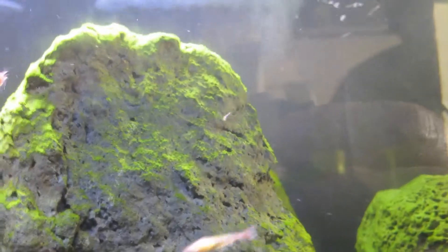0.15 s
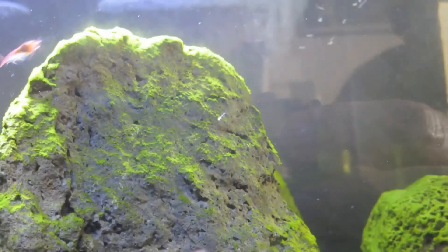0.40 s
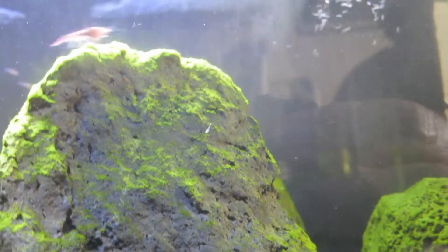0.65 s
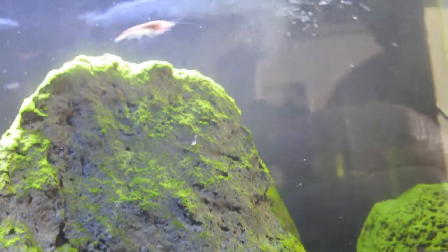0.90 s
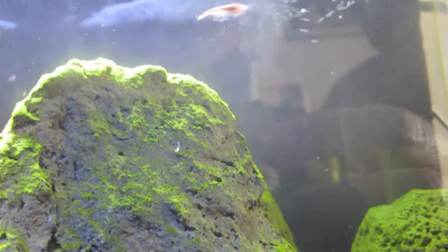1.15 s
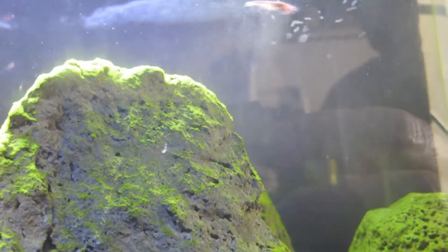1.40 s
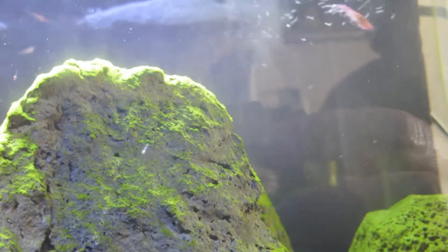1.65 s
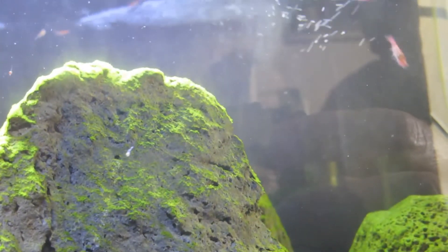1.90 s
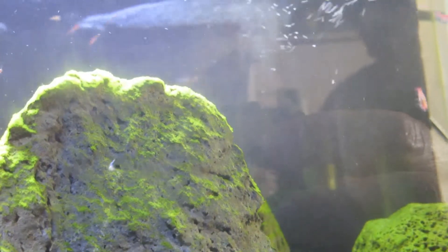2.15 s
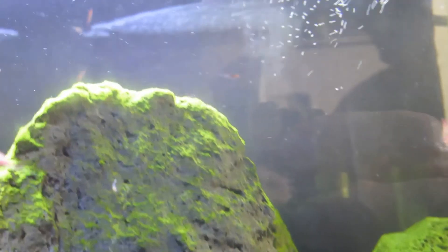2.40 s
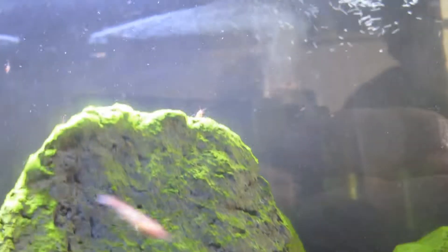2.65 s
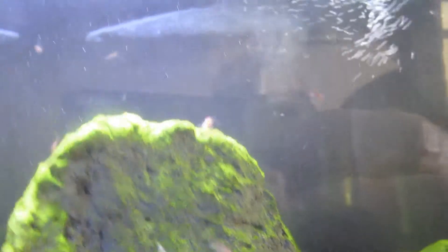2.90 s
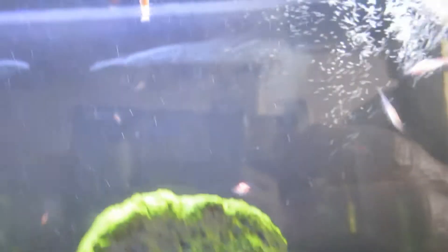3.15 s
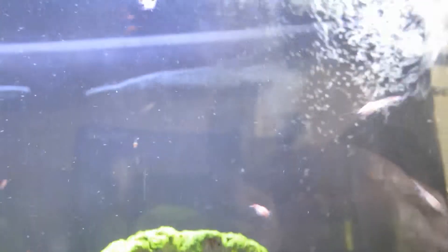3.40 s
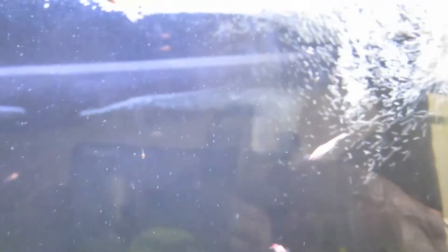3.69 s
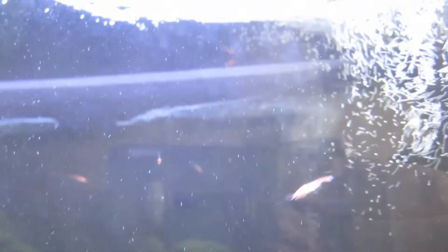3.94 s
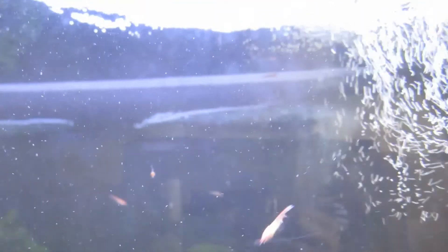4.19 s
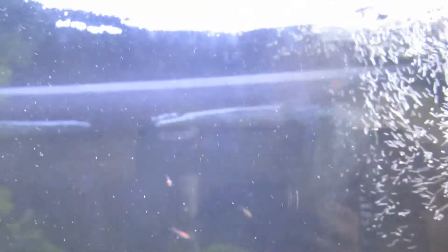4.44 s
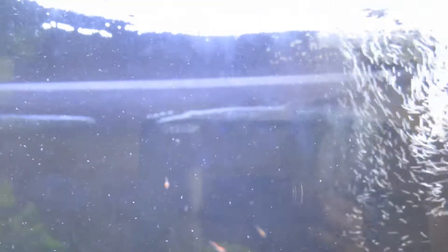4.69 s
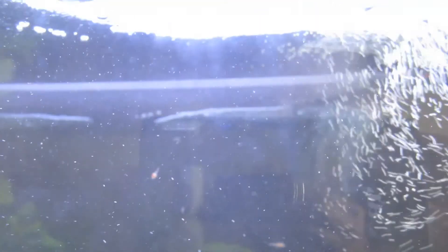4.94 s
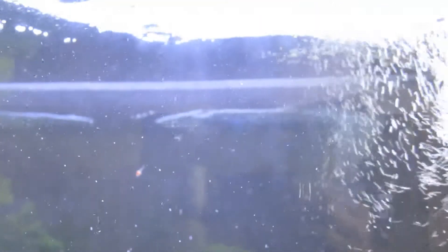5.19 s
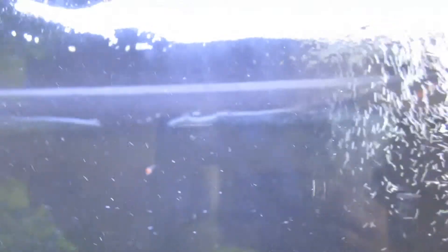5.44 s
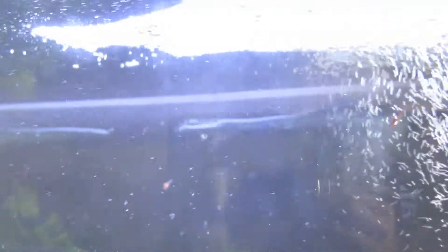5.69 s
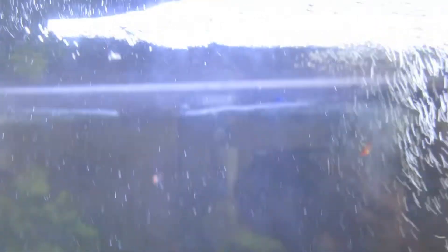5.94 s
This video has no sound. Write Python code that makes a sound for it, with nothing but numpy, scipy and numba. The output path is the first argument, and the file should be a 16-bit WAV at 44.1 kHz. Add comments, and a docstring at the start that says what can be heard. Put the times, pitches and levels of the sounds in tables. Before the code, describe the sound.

A small air pump hums and buzzes steadily beside a fish tank, with faint fizzing bubbles, soft gurgles and a dull room rumble.

```python
"""A mains-driven diaphragm air pump hums beside a fish tank: wavering sines at multiples of mains.
Its valve is a smeared tick repeated every cycle; short rising sine pings make fizz, burble and gurgles.
Wavering drones of other small motors and a dull, surging noise rumble lie behind.
Two microphone ports close together rise from the tank floor to the water line, shifting the balance;
coarse rounding of the finished mix's spectral lines leaves holes in the treble."""
import sys
import numpy as np
from scipy import signal
from scipy.fft import rfft, irfft, dct, next_fast_len
from scipy.io import wavfile
from scipy.ndimage import uniform_filter1d
from numba import njit

SR = 44100
rng = np.random.default_rng(int(sys.argv[2]) if len(sys.argv) > 2 else 0)


def gain_from_decibels(decibels):
    """Convert decibel values to linear amplitude factors."""
    exponent = np.asarray(decibels, float) / 20
    return 10 ** exponent


def transcribe(signal):
    """Save signal, clipped to [-1, 1], as a 16-bit WAV file at the path in sys.argv[1]."""
    frames = np.atleast_2d(signal).T
    limited = np.clip(frames, -1, 1)
    pcm = np.round(limited * 32767).astype(np.int16)
    wavfile.write(sys.argv[1], SR, pcm)


N = 267687  # samples, about 6.07 s

MAINS_HZ = 60.036
PORT_LAG_S = 0.00012  # full delay between the ports
EARS = np.array([[1], [-1]])  # sign for left, right


def colour(points, hz):
    """Gain of a spectrum given as (f/Hz, level/dB) points, interpolated over log frequency."""
    f, db = np.array(points).T
    return gain_from_decibels(np.interp(np.log(hz + 1), np.log(f), db))


def level(x, db):
    """Scale the sound to an rms level in dB."""
    return x * gain_from_decibels(db) / np.sqrt(np.mean(x ** 2))


def curve(table, column=1):
    """Draw one column of a timed table as a line through the whole scene."""
    points = np.array(table)
    return np.interp(np.arange(N) / SR, points[:, 0], points[:, column])


def walk(rate, size=16):
    """Random levels held 1 / rate s and slewed twice; spread near 1."""
    held = np.repeat(rng.standard_normal(int(N / SR * rate) + 2), size)
    slewed = uniform_filter1d(uniform_filter1d(held, size), size)
    return 1.2 * np.interp(np.arange(N) / SR * rate * size, np.arange(len(held)), slewed)


def ports(make, points, direct, lag_s):
    """Left and right of a wide source: a share comes from one side and lags, the rest from all round."""
    # How alike the ports hear sound from all round [f/Hz, correlation]
    likeness = [(300, 1), (550, 0.93), (1100, 0.49), (2000, 0.73), (3300, 0.21), (3900, -0.48),
                (4400, 0.17), (5000, -0.25), (7000, -0.21), (10600, -0.22)]
    size = next_fast_len(N)
    hz = np.arange(size // 2 + 1) * SR / size
    one, same, other = (rfft(make(), size) for _ in range(3))
    f, correlation = np.array(likeness).T
    alike = np.clip(np.interp(np.log(hz + 1), np.log(f), correlation), -1, 1)
    diffuse = np.sqrt((1 + alike) / 2) * same + EARS * np.sqrt((1 - alike) / 2) * other
    direct = np.clip(direct, 0, 1)
    sided = one * np.exp(-1j * np.pi * hz * lag_s * EARS)
    both = np.sqrt(direct) * sided + np.sqrt(1 - direct) * diffuse
    return irfft(both * colour(points, hz), size)[:, :N]


def tone(hz, db, lag_s):
    """A sine at an rms level that may vary; any lag makes it reach the left port late."""
    phase = 2 * np.pi * (hz * np.arange(N) / SR + rng.random())
    half = np.pi * hz * lag_s
    sideways = EARS * np.sin(half) * np.cos(phase) if lag_s else 0
    return np.sqrt(2) * gain_from_decibels(db) * (np.cos(half) * np.sin(phase) - sideways)


@njit
def bubbles(n, start, hz, cycles, size, rise):
    """Each bubble rings down over a few cycles while its pitch glides up by the share rise."""
    out = np.zeros(n)
    for k in range(len(start)):
        length = int(3 * cycles * SR / hz[k])
        phase = 0.
        for i in range(min(length, n - start[k])):
            phase += 2 * np.pi * hz[k] / SR * (1 + rise * i / length)
            out[start[k] + i] += size[k] * np.exp(-6. * i / length) * np.sin(phase)
    return out


def patchy(x, low_hz, high_hz, patch_db, rate, count):
    """Narrow neighbouring bands swell and sink each on its own."""
    hz = np.arange(N // 2 + 1) * SR / N
    flat, out = rfft(x), x
    place = np.log((hz + 1) / low_hz) / np.log(high_hz / low_hz) * (count - 1)
    for band in range(count):
        share = np.clip(1 - abs(place - band), 0, 1)
        out = out + (gain_from_decibels(patch_db * walk(rate)) - 1) * irfft(flat * share, N)
    return out


def rumble(lift, db=-33, direct=0.29, swell_db=0.4, surge_db=1.5):
    """Broad noise of the pump case and the room, mostly from all round; it surges in uneven lumps."""
    # Tilt of the case and room noise, before overall levelling [f/Hz, relative level per Hz/dB]
    noise_shape = [(25, -74), (40, -75.5), (70, -63.5), (120, -59), (200, -61), (330, -61.5), (420, -62),
                   (650, -69), (1000, -72), (1600, -81), (2800, -84.5), (3350, -89), (3900, -95.5),
                   (6500, -93.5), (10500, -101.5)]
    # Change of that noise once the ports are raised [f/Hz, change/dB]
    raised_change = [(100, 0.5), (400, -2), (1200, 1.5), (4000, 0.5)]
    # Resonances in that noise [f/Hz, width/Hz, boost/dB]
    resonances = [(93, 24, 1), (238, 23, 1.5), (322.6, 29, 5.5), (403.4, 25, -2.5), (499, 37, 1.5),
                  (738, 21, 5), (924, 30, 3), (4283, 170, 4.5), (5480, 180, 3)]
    hz = np.arange(N // 2 + 1) * SR / N
    flat = rfft(ports(lambda: rng.standard_normal(N), noise_shape, direct, PORT_LAG_S))
    boost_db = sum(g / (1 + (2 * (hz - f) / w) ** 2) for f, w, g in resonances)
    low = flat * gain_from_decibels(boost_db)
    raised = irfft(low * (colour(raised_change, hz) - 1), N)
    now = irfft(low, N) + lift * raised
    surging = patchy(now, 134, 1240, surge_db, 16.0, count=8)
    return gain_from_decibels(swell_db * walk(6)) * level(surging, db)


def drones(waver_db=1.8):
    """Slower motors further off hum as sines that waver more than the pump's slow waver."""
    # Tones of other motors in the room, before wavering [f/Hz, level/dB]
    motor_tones = [(33.77, -76), (52.31, -53.5), (72.3, -46), (144.63, -45), (168.3, -47), (207.7, -47),
                   (209.27, -44.5), (216.91, -54), (234.97, -47.5), (271.11, -47.5), (336.12, -46),
                   (361.47, -51.5)]
    return sum(tone(hz, db + waver_db * walk(3.1), 0) for hz, db in motor_tones)


def gurgles(under_db=-9, spread_s=0.035, count=8):
    """Larger bubbles break in short clusters, each bubble a rising ping."""
    # Clusters of larger bubbles; under_db is added to each bubble [t/s, level/dB]
    clusters = [(1.98, -32.5), (2.206, -39), (2.369, -31), (3.916, -42), (4.499, -40), (5.399, -39)]
    s, db = np.repeat(np.transpose(clusters), count, axis=1)
    late, pitch = rng.random((len(s), 2)).T
    start = ((s + spread_s * late) * SR).astype(int)
    return bubbles(N, start, 600 * 2.6 ** pitch, 13.7, gain_from_decibels(db + under_db), 0.29)


def burble(per_s=160, spread_db=1.0, low_hz=350, tilt_db=-5):
    """Middle-sized bubbles keep breaking at the surface, in uneven runs."""
    # Loudness of the surface bubbling, before its random unevenness [t/s, level/dB]
    bubbling = [(0, -72), (1.2, -49), (2.2, -44), (2.7, -47.5), (3.6, -61), (4.5, -48), (5.0, -47),
                (5.5, -45), (6.07, -39.5)]
    when, pitch, size = rng.random((int(per_s * N / SR), 3)).T
    start = (when * N).astype(int)
    size_db = -spread_db * np.log(size + 1e-9) + tilt_db * pitch
    pops = bubbles(N, start, low_hz * 4.5 ** pitch, 11.0, gain_from_decibels(size_db), 0.18)
    return level(pops, 0) * gain_from_decibels(curve(bubbling) + 2.5 * walk(14.0))


def fizz(lift, db=-61, per_s=3200, spread_db=-0.5, stroke=0.17, lift_db=1.5):
    """Thousands of pinhead bubbles burst as tiny pings; the fizz swells with each pump stroke."""
    # Tilt of the fizz, before overall levelling [f/Hz, relative level/dB]
    fizz_shape = [(1500, -42), (3000, 3), (4500, -11), (6500, -2), (8500, 2), (10500, 1.5)]

    def swarm():
        """Scatter bursts evenly in time, with pitches even over log frequency."""
        when, pitch, size = rng.random((int(per_s * N / SR), 3)).T
        start = (when * N).astype(int)
        sizes = gain_from_decibels(-spread_db * np.log(size + 1e-9))
        return bubbles(N, start, 2000 * 5.5 ** pitch, 1.9, sizes, 0.13)

    push = 1 + stroke * np.cos(2 * np.pi * (np.arange(N) / SR * MAINS_HZ - .82))
    swell = gain_from_decibels(lift_db * lift + 0.41 * walk(22.0))
    return swell * push * level(ports(swarm, fizz_shape, 0.33, PORT_LAG_S), db)


def valve(db=-66, t60_s=0.034, moment=.7, places=3):
    """The flap valve ticks once a cycle; reflections smear the tick, differently as the ports move."""
    # Ringing bands of the flap, before overall levelling [f/Hz, width/Hz, relative level/dB]
    flap_bands = [(2710, 320, -12), (4300, 880, -32), (5200, 220, -9), (6500, 400, 9), (7980, 1000, 3.5)]
    size, out = 8192, 0  # points in one mains cycle
    turns = np.arange(N) / SR * MAINS_HZ - moment
    hz = np.arange(size // 2 + 1) * MAINS_HZ
    ring = sum(gain_from_decibels(g) / (1 + (2 * (hz - f) / w) ** 4) for f, w, g in flap_bands)
    fade = np.exp(-np.log(1000) * np.arange(4 * size) / (size * MAINS_HZ * t60_s))
    at = (turns - EARS * PORT_LAG_S * MAINS_HZ / 2) % 1 * size
    for place in range(int(places)):
        # Tails longer than a cycle fold onto the following ticks
        smear = (rng.standard_normal(4 * size) * fade).reshape(4, size).sum(axis=0)
        cycle = irfft(rfft(smear) * ring, size)
        near = np.clip(1.2 - abs(np.linspace(0, places - 1, N) - place), 0, 1)
        out = out + near * np.interp(at, np.arange(size), cycle, period=size)
    return level(out, db)


def pump(lift, waver_db=0.8, flutter_db=1.5):
    """Coil and diaphragm shake the case at multiples of mains; all but the twice-mains hum waver randomly."""
    # The wavering hum at twice mains [t/s, level/dB]
    twice_mains = [(0.1, -29), (0.6, -30.5), (1.1, -30), (2.0, -30), (2.4, -28), (3.4, -28), (3.7, -32.5),
                   (4.5, -29), (5.0, -31), (5.33, -28), (5.55, -31.5), (5.9, -27.5)]
    # Strongest other multiples, before wavering [multiple, level when low/dB, level when raised/dB]
    strong_multiples = [(1, -49.7, -49.9), (3, -43.5, -42.2), (4, -41.5, -46), (5, -52, -57),
                        (6, -49.4, -50.0), (8, -51.1, -50.9), (9, -55.4, -57.3), (10, -58, -58),
                        (12, -47.5, -50.5), (13, -55.8, -62.2), (14, -47.5, -53), (16, -59, -64),
                        (19, -58, -57.5), (22, -67, -62), (24, -62.5, -68), (25, -66, -65), (28, -64, -65),
                        (30, -66, -66)]
    top_multiple = 34
    # The remaining multiples fall off along a line, with scatter
    weak_start_db, weak_db_per_multiple, weak_scatter_db = -59, -0.42, 2
    # Low tones reach both ports together; the lag grows in above
    lag_from_hz, lag_full_hz = 200, 1100

    out = tone(2 * MAINS_HZ, curve(twice_mains), 0)
    strong = {round(multiple): ends for multiple, *ends in strong_multiples}
    for multiple in set(range(1, top_multiple + 1)) - {2}:
        scatter_db = weak_scatter_db * rng.standard_normal(size=2)
        weak_db = weak_start_db + weak_db_per_multiple * multiple + scatter_db
        low_db, high_db = strong.get(multiple, weak_db)
        db = low_db + lift * (high_db - low_db) + waver_db * walk(3.2) + flutter_db * walk(14.0)
        hz = multiple * MAINS_HZ
        lag_share = np.clip((hz - lag_from_hz) / (lag_full_hz - lag_from_hz), 0, 1)
        out = out + tone(hz, db, PORT_LAG_S * lag_share)
    return out


def thin(x, mute, offset, patch_db=2.5, size=1024, count=12):
    """Spectral lines are made uneven, then rounded coarsely; weak ones fall silent, leaving holes."""
    # Random unevenness given to the spectral lines before rounding [f/Hz, spread/dB]
    line_spread = [(500, 0), (1000, 1.5), (2000, 3), (4000, 4), (8000, 3), (10500, 2.5)]
    half = size // 2
    window = np.sin(np.pi * (np.arange(2 * size) + .5) / (2 * size))
    lead = 2 * size - offset
    blocks = np.pad(x, (lead, 3 * size - (lead + N) % size)).reshape(-1, size)

    # Overlapping frames folded into a lapped cosine transform
    a, b, c, d = np.split(np.hstack([blocks[:-1], blocks[1:]]) * window, 4, axis=1)
    lines = dct(np.hstack([-c[:, ::-1] - d, a - b[:, ::-1]]), type=4, norm="ortho")
    hz = (np.arange(size) + .5) * SR / 2 / size

    uneven = uniform_filter1d(rng.standard_normal(lines.shape), size=3, axis=1)
    uneven = 4 * uniform_filter1d(uneven, size=5, axis=0)  # spread near 1
    lines = lines * colour(line_spread, hz) ** uneven

    # The step follows the neighbours' mean and wanders band by band, count lines to a band
    power = lines ** 2 + 1e-20
    around = uniform_filter1d(uniform_filter1d(power, size=21, axis=1), size=31, axis=0)
    patch = uniform_filter1d(rng.standard_normal((len(lines), size // count + 1)), size=4, axis=0)
    bar_db = 2 * patch_db * np.repeat(patch, count, axis=1)[:, :size]
    step = 2 * np.sqrt(around) * colour(mute, hz) * gain_from_decibels(bar_db)
    whole = np.floor((abs(lines) / step) ** .75 + .4054)  # lines under half a step become zero

    # Back to sound by overlap-add
    kept = dct(np.sign(lines) * step * whole ** (4 / 3), type=4, norm="ortho")
    p, q = kept[:, :half], kept[:, half:]
    frames = np.hstack([q, -q[:, ::-1], -p[:, ::-1], -p]) * window
    return (frames[1:, :size] + frames[:-1, size:]).ravel()[lead - size:][:N]


def scene():
    """Mix every layer while the ports rise towards the water line."""
    # Height of the ports, 0 low to 1 at the water line [t/s, height]
    port_height = [(0, 0.055), (2.4, 0.12), (3.8, 0.81), (6.07, 1)]
    lift = np.clip(curve(port_height), 0, 1)
    background = rumble(lift) + drones()
    water = gurgles() + burble() + fizz(lift)
    return background + water + valve() + pump(lift)


def top_cut(x):
    """Nothing passes above the cut-off."""
    return signal.sosfilt(signal.butter(12, 10870, fs=SR, output="sos"), x)


def record(dry):
    """Keep the bass the same left and right, then thin the middle and the left-right difference."""
    # Lines under this share of their neighbours' mean fall silent, before wandering [f/Hz, share/dB]
    mid_mute = [(300, -25), (1000, -22), (1600, -15), (2800, -8), (3350, -6), (3800, 4.5), (4400, 2),
                (5000, 4.5), (6000, -3), (7500, -6.5), (9000, -3), (10500, 1.5)]
    # The same for the left-right difference [f/Hz, share/dB]
    difference_mute = [(350, 9), (550, 4), (800, -4), (1200, -9), (1900, -5), (3000, -11), (4000, -7.5),
                       (7000, -7.5), (9000, -3), (10500, -0.5)]
    mid, side = (dry[0] + dry[1]) / 2, (dry[0] - dry[1]) / 2
    mono_below = signal.butter(3, 318, "highpass", fs=SR, output="sos")  # Hz
    side = signal.sosfiltfilt(mono_below, side)
    offset = 873  # samples to the start of a frame
    mid, side = thin(mid, mid_mute, offset), thin(side, difference_mute, offset)
    return top_cut(mid + EARS * side)


dry = scene()
out = record(dry)
transcribe(out)
```